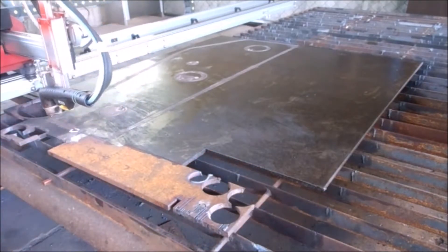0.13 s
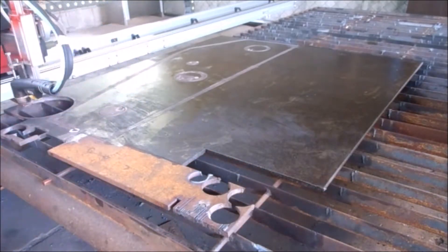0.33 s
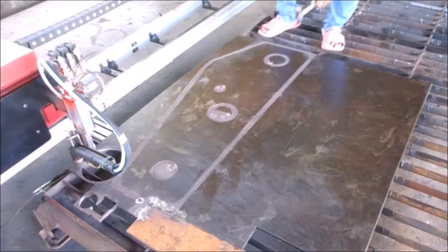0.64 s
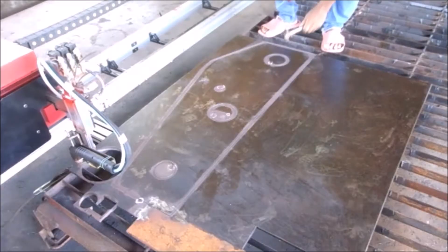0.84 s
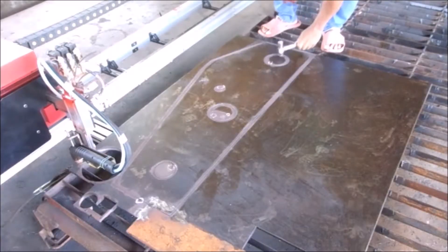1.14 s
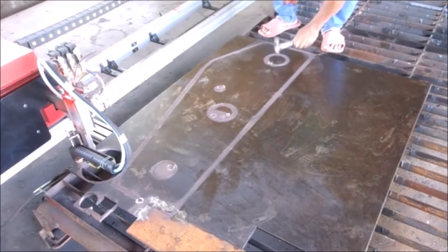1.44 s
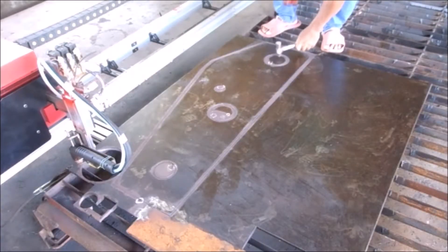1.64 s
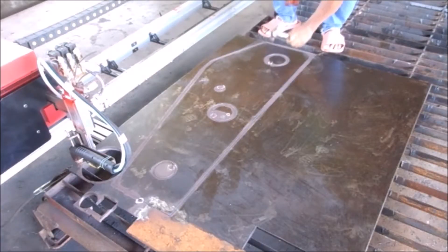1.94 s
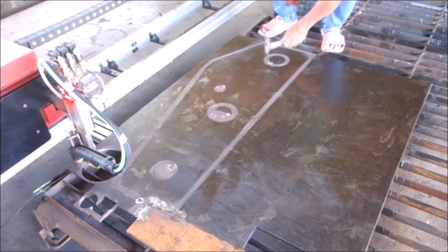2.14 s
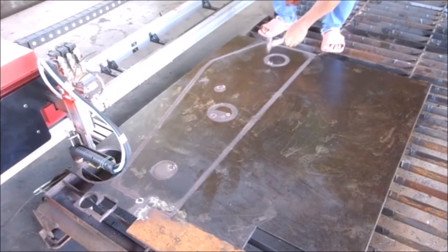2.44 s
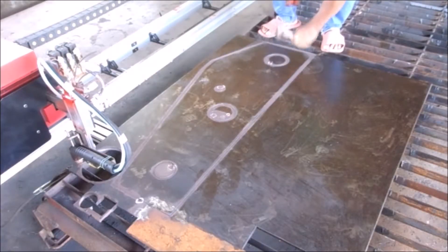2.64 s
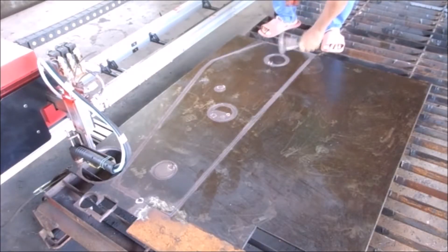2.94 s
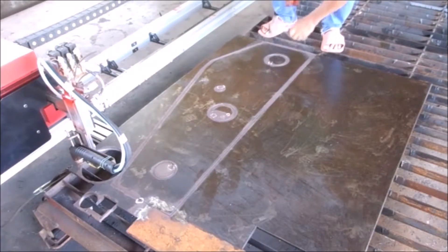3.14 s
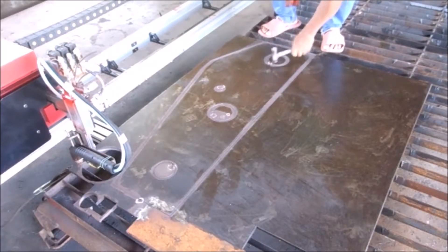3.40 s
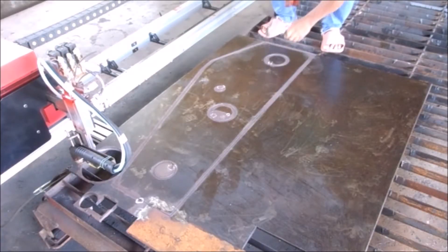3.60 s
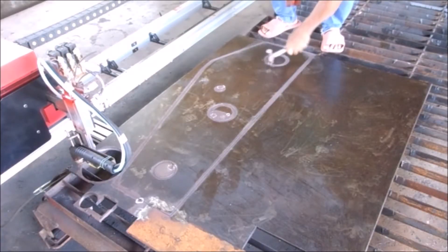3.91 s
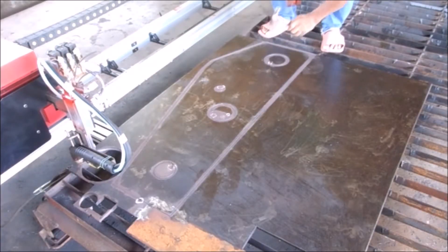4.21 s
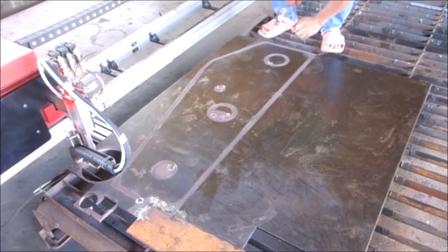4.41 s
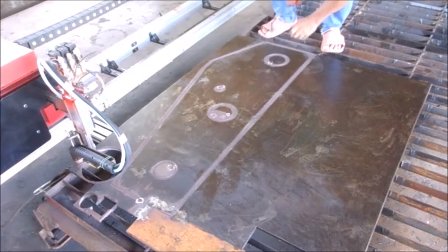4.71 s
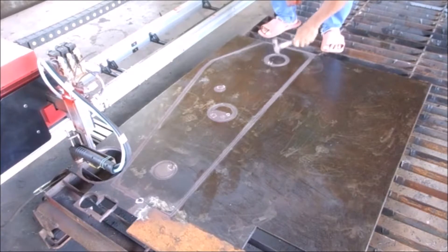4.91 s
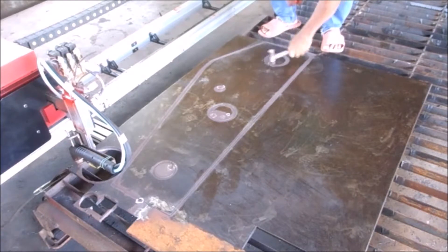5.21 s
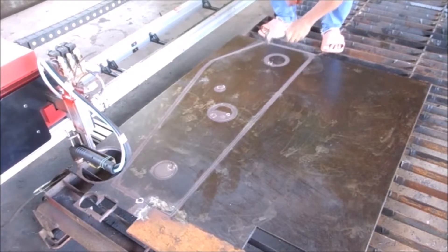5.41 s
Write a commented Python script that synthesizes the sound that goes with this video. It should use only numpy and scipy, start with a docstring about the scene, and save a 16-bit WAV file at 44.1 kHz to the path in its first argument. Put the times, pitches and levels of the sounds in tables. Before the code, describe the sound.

After brief silence, a steady machine hum cuts in, then a hammer clangs twelve times on a steel plate, loud and overloaded.

```python
"""Hammer on a cut steel plate

A hammer knocks twelve times on a freshly cut steel plate lying on a cutting table's slats, in a workshop.
Each blow is a low thump and bright overload splatter of filtered noise, over a clang of noise coloured
by the plate's modes; the first three blows overload most, with heavy thump and splatter.
The cutting machine runs steadily behind: shaped fan noise and a stack of wavering motor tones.
Overloaded microphones flatten the blows, and a gain control pushes the hum down between them."""
import sys
import numpy as np
from scipy import signal
from scipy.fft import rfft, irfft
from scipy.io import wavfile
from scipy.ndimage import uniform_filter1d

SR = 44100
rng = np.random.default_rng(int(sys.argv[2]) if len(sys.argv) > 2 else 0)


def persist_wave(psi):
    """Save psi, clipped to +-1, as 16-bit WAV."""
    counts = np.round(np.clip(psi, -1, 1) * 32767).astype(np.int16)
    wavfile.write(sys.argv[1], SR, np.atleast_2d(counts).T)


N = 244755  # length in samples

# hammer blows, with the two mode clusters each struck spot favours:
# t/s, relative force level/dB, chatter duration/s, clang f/Hz, ping f/Hz
BLOWS = [ (1.2184, -2, 0.021, 3660, 6330), (1.4620, -.5, .014, 3300, 7140), (1.7143, 1.5, 0.01, 1800, 4800),
         (2.1255, -2, 0.01, 1930, 5470), (2.4043, -1.5, 0.02, 2460, 5730), (2.8019, -1, .026, 2020, 7500),
         (3.0686, -1, 0.025, 2320, 4730), (3.508, 0, 0.025, 2400, 7560), (3.9688, 0.5, 0.03, 2530, 10200),
         (4.6249, -2.5, 0.047, 2330, 4720), (4.9252, -1, 0.028, 2360, 7900), (5.302, -2, 0.04, 2370, 9900)]
# the plate's strongest single modes: f/Hz, lift in level/dB
PLATE_MODES = [(676, 5.5), (1375, 6.5), (1739, 8), (1850, 7.5), (2128, 11), (2210, 5.5), (2401, 2.5),
               (2471, 8), (2705, 10), (3039, 10.5), (3141, 3.5), (3494, 4), (3673, 2), (4309, 4), (4683, 5),
               (4885, 3), (5607, 11), (5752, 4.5), (7418, 5), (10282, 14)]
# spectrum of the plate's crowd of overlapping modes: f/Hz, relative level/dB
CLANG_SPECTRUM = [(30, -25), (100, -19.5), (220, -6.5), (400, -7.5), (800, -6), (1300, -3), (2300, -0.5),
                  (3600, -2.5), (4900, -4.5), (6500, -8), (8000, -9), (10500, -12), (14500, -14.5)]
# decay of plate and hall together, before the ring factor: f/Hz, t60/s
RING_T60 = [(80, 0.8), (300, 0.44), (1000, 0.5), (2300, 0.42), (5000, 0.33), (8000, 0.27), (14000, 0.18)]
# stereo likeness of clang and splatter: f/Hz, left-right correlation (no unit)
CLANG_LIKENESS = [(100, 0.99), (600, 0.98), (1300, 0.97), (2500, 0.95), (5000, 0.79), (8000, 0.41),
                  (14000, 0.13)]
# low thump of a blow, spectrum: f/Hz, relative level/dB
THUMP_SPECTRUM = [(20, -13), (80, 0.5), (220, -0.5), (350, -5.5), (700, -14.5), (2000, -46), (14000, -90)]
# low thump of a blow, stereo likeness: f/Hz, left-right correlation (no unit)
THUMP_LIKENESS = [(30, 0.5), (300, 0.75)]
# bright splatter of the overload at the start of a blow, spectrum: f/Hz, relative level/dB
SPLATTER_SPECTRUM = [(100, -38), (1500, -33), (5000, 7), (9000, 2), (14500, -8)]
# the machine's fans, spectrum: f/Hz, relative level/dB
FAN_SPECTRUM = [(30, -34), (75, -16.5), (120, -13), (200, -2.5), (310, -10), (470, -4.5), (850, -8),
                (1150, -2), (1600, -4.5), (1800, -10), (3300, -15.5), (4400, -20.5), (7500, -28.5),
                (14500, -34.5)]
# the machine's fans, stereo likeness: f/Hz, left-right correlation (no unit)
FAN_LIKENESS = [(100, 0.98), (700, 1), (1400, 0.96), (3000, 0.87), (6700, 0.52), (14000, 0.084)]
# the machine's motor tones: centre f/Hz, rms level/dB before the common trim
MOTOR_TONES = [(97, -50.5), (209, -46), (246, -37.5), (377, -43.5), (912, -37.5), (1158, -31.5),
               (1373, -37), (1453, -37.5), (1620, -37), (2476, -43.5), (4990, -52), (7176, -57)]

# the blows change from early to late character: midpoint and gradualness of the change
CHANGE_AT_S, CHANGE_WIDTH_S = 1.8, 0.11
# (early, late) pairs: the first three blows overload most, with heavy thump and splatter; later blows
# carry far less, with less body, more treble, more lift of the favoured clusters and a shorter ring
THUMP_DB, SPLATTER_DB = (2, -14), (-0.5, -14.5)
LIFT_DB, BODY_DB, TREBLE_DB = (5.5, 7.5), (5.5, 2), (-5.5, -0.5)
RING_FACTOR = (0.92, 0.83)  # multiplies t60


def hammer(level_db=3.0, rise_s=0.00023, first_db=3, first_s=0.0023):
    """A hard onset starts each blow and the plate rings on; later blows carry less thump and splatter."""
    t = np.arange(2 ** 15) / SR
    hz = np.fft.rfftfreq(len(t), 1 / SR)
    out = np.zeros((2, N))
    # a very fast rise, with a short boost on the first instant
    attack = (1 - np.exp(-t / rise_s)) * gain_of(first_db * np.exp(-t / first_s))
    pairs = (THUMP_DB, SPLATTER_DB, LIFT_DB, BODY_DB, TREBLE_DB, RING_FACTOR)
    for start_s, force_db, chatter_s, clang_hz, ping_hz in BLOWS:
        lateness = 1 / (1 + np.exp((CHANGE_AT_S - start_s) / CHANGE_WIDTH_S))
        thump_db, splatter_db, lift_db, body_db, treble_db, ring = (
            early + (late - early) * lateness for early, late in pairs)
        spot_db = spot_colour(hz, body_db, treble_db, lift_db, clang_hz, ping_hz)
        ringing = crowded_modes(t, read(CLANG_SPECTRUM, hz) + spot_db, ring, chatter_s)
        clang = gain_of(level_db + force_db) * ringing * clatter(t, chatter_s)
        onset = thump_and_splatter(t, chatter_s, thump_db, splatter_db)
        add(out, start_s, attack * (clang + onset))
    return out


def thump_and_splatter(t, chatter_s, thump_db, splatter_db, bounce_s=0.006, decay_s=0.034):
    """The start of a blow: a low thump and the overload's bright splatter, both noise cut short."""
    hz = np.fft.rfftfreq(len(t), 1 / SR)
    thump = noise_pair(read(THUMP_SPECTRUM, hz), hz, THUMP_LIKENESS)
    splatter = noise_pair(read(SPLATTER_SPECTRUM, hz), hz, CLANG_LIKENESS)
    splatter = splatter * (0.5 + np.exp(-t / decay_s)) * clatter(t, chatter_s, kick=2.9)
    cutoff = 1 / (1 + (t / (bounce_s + chatter_s / 2)) ** 5)
    return (gain_of(thump_db) * thump + gain_of(splatter_db) * splatter) * cutoff


def clatter(t, chatter_s, kick=0.8, kick_s=0.0047, lasts=1.7):
    """The plate slaps its slats seven times after the blow; each slap is a brief surge in level."""
    when, size = rng.random((2, 7, 1))  # both 0..1
    age = t - when * lasts * chatter_s
    surges = size * (age > 0) * np.exp(-abs(age) / kick_s)
    return 1 + kick * surges.sum(0)


def crowded_modes(t, db, ring, chatter_s, hall_db=-18, hall_longer=2.68):
    """Modes too close to tell apart: held while the plate chatters, then dying by band into the hall's tail."""
    hz = np.fft.rfftfreq(len(t), 1 / SR)
    bins, age, z = signal.stft(noise_pair(db, hz, CLANG_LIKENESS), SR, nperseg=256)
    t60 = ring * read(RING_T60, bins)[:, None]
    fall = np.log(1000) * np.maximum(age - chatter_s, 0) / t60
    plate = np.exp(-fall)
    hall = gain_of(hall_db) * np.exp(-fall / hall_longer)
    z = z * np.hypot(plate, hall)  # powers add
    return signal.istft(z, SR, nperseg=256)[1][:, :len(t)]


def spot_colour(hz, body_db, treble_db, lift_db, clang_hz, ping_hz,
                body_hz=1150, treble_hz=6000, uneven_db=1.5, cluster_hz=200, ping_share=0.98):
    """The struck spot favours two clusters of modes and, by chance, lifts or starves patches of others."""
    patches = uniform_filter1d(rng.standard_normal(len(hz)), size=45)
    patches = evened(uniform_filter1d(patches, size=30))
    high = hz ** 2 / (hz ** 2 + treble_hz ** 2)
    body = np.exp(-2 * np.log2((hz + 1) / body_hz) ** 2)
    clang = lift_db / (1 + ((hz - clang_hz) / cluster_hz) ** 2)
    ping = ping_share * lift_db / (1 + ((hz - ping_hz) / cluster_hz) ** 2)
    # a lone mode stands out less where its whole cluster rings
    peaks = np.maximum(clang + ping, mode_peaks(hz))
    return peaks + body_db * body + treble_db * high + uneven_db * (1 + high) * patches


def mode_peaks(hz, width_hz=14):
    """Narrow resonances of the plate, the same for every blow."""
    return sum(db / (1 + ((hz - f) / width_hz) ** 2) for f, db in PLATE_MODES)


def machine(fan_db=-22.5, tones_db=-2, waver_hz=4, flutter=0.18):
    """Fans make broad noise; motors add sines that wander slightly in pitch and level."""
    hz = np.fft.rfftfreq(2 * N, 1 / SR)
    fan = gain_of(fan_db) * noise_pair(read(FAN_SPECTRUM, hz), hz, FAN_LIKENESS)[:, :N]
    tones = np.zeros(N)
    for f, db in MOTOR_TONES:
        level = gain_of(db) * (1 + flutter * drift(count=N, rate_hz=15.0))
        pitch_hz = f + waver_hz * drift(count=N, rate_hz=8.67)
        tones += level * np.sin(2 * np.pi * np.cumsum(pitch_hz) / SR)
    return fan + gain_of(tones_db) * np.sqrt(2) * tones  # sqrt(2): rms to peak


def noise_pair(db, hz, likeness):
    """Stereo noise of rms 1 with the spectrum db; likeness sets how alike left and right are by frequency."""
    a, b = rng.standard_normal((2, len(hz))) + 1j * rng.standard_normal((2, len(hz)))
    same = np.clip(read(likeness, hz), -1, 1)
    mid = a * np.sqrt(1 + same)
    side = b * np.sqrt(1 - same)
    return evened(irfft(np.array([mid + side, mid - side]) * gain_of(db)))


def drift(count, rate_hz):
    """Slow random wander of rms 1: white noise through a Gaussian low-pass."""
    hz = np.fft.rfftfreq(2 * count, 1 / SR)
    spectrum = rfft(rng.standard_normal(2 * count)) * np.exp(-(hz / rate_hz) ** 2)
    return evened(irfft(spectrum)[:count])


def gain_of(db):
    """Decibels to amplitude."""
    return 10 ** (np.asarray(db) / 20)


def evened(x):
    """Scales to rms 1."""
    return x / np.sqrt(np.mean(x ** 2) + 1e-20)


def read(points, hz):
    """Reads a table on a log-frequency axis."""
    f, value = np.transpose(points)
    return np.interp(np.log(hz + 1), np.log(f + 1), value)


def add(mix, start_s, sound):
    """Mixes a stereo sound in at start_s, trimmed to the end of the mix."""
    part = mix[:, round(start_s * SR):][:, :sound.shape[1]]
    part += sound[:, :part.shape[1]]


def scene():
    """Hammer and machine, a little to the right."""
    return (hammer() + machine()) * gain_of([[-0.3], [0.3]])


def gain_control(x, limit_db=-10, attack_s=0.081, hold_s=0.18, recover_db_per_s=20, size=64):
    """Turns the gain down while the output is too loud, waits, and lets it creep back up."""
    power = uniform_filter1d((x ** 2).mean(0), 2 * size)[::size]
    level_db = 10 * np.log10(abs(power) + 1e-12)
    step_s = size / SR
    cut_db, quiet_s, cuts = 0, 0, []
    for db in level_db:
        over_db = db - cut_db - limit_db
        quiet_s = 0 if over_db > 0 else quiet_s + step_s
        if over_db > 0:
            cut_db += over_db * min(step_s / attack_s, 1)
        elif quiet_s > hold_s:
            cut_db = max(cut_db - recover_db_per_s * step_s, 0)
        cuts.append(cut_db)
    return x * gain_of(-np.interp(np.arange(N), np.arange(len(cuts)) * size, cuts))


def record(dry, ceiling=0.71, knee=2.8, start_s=0.5635, edge_hz=14400):
    """Gain control, soft overload, phase shift and a treble limit; silence until the microphones open."""
    drive = gain_control(dry) / ceiling
    wave = ceiling * drive / (1 + abs(drive) ** knee) ** (1 / knee)
    # an all-pass phase shift turns the flattened crests ragged again
    wave = signal.lfilter([-0.2, 1], [1, -0.2], wave)
    wave = np.clip(wave, -1, 1) * (np.arange(N) / SR > start_s)
    low_pass = signal.firwin(511, edge_hz, window=("kaiser", 9), fs=SR)
    return signal.oaconvolve(wave, low_pass[None], "same")


dry = scene()
out = record(dry)
persist_wave(out)
```